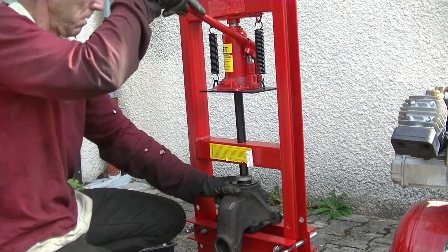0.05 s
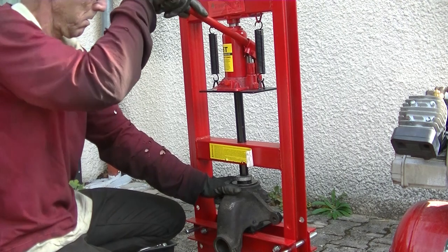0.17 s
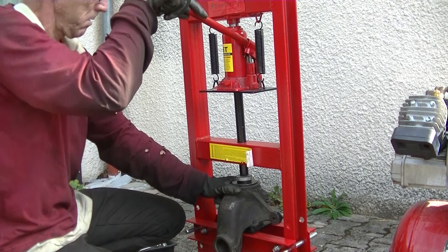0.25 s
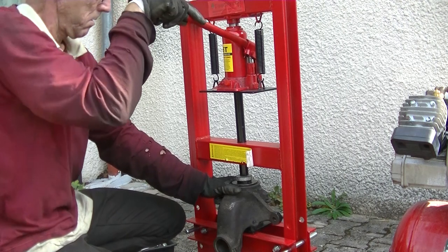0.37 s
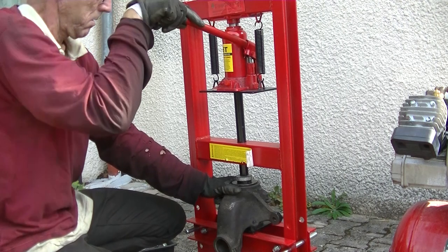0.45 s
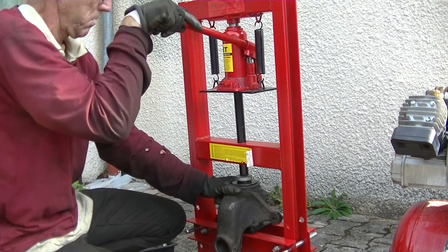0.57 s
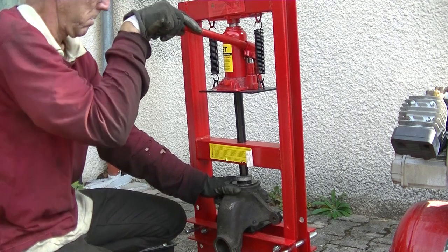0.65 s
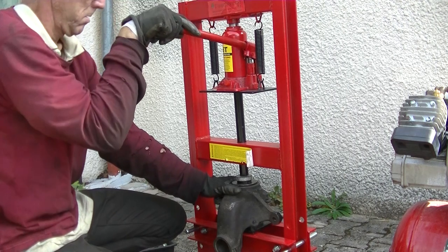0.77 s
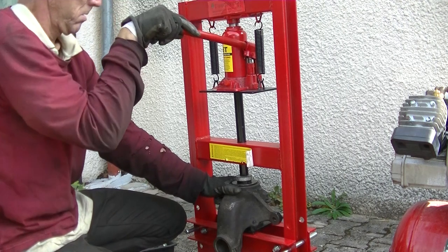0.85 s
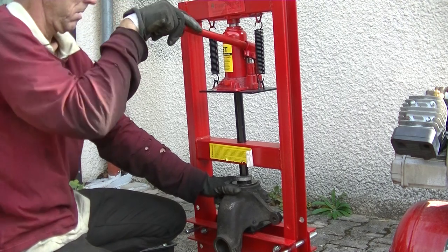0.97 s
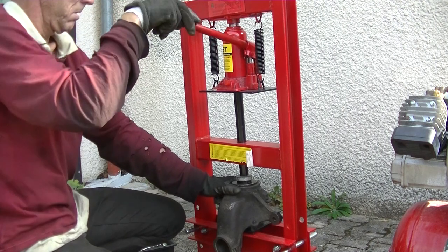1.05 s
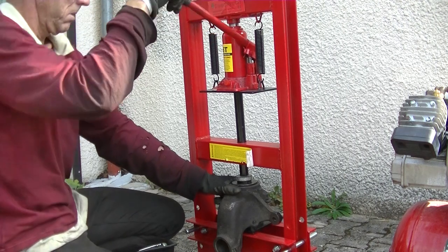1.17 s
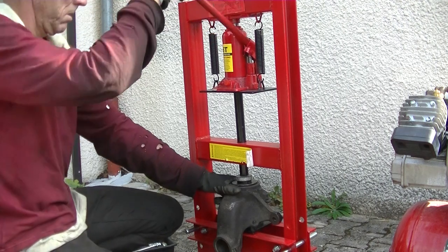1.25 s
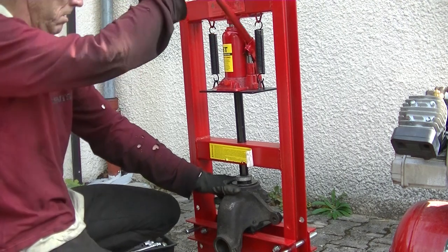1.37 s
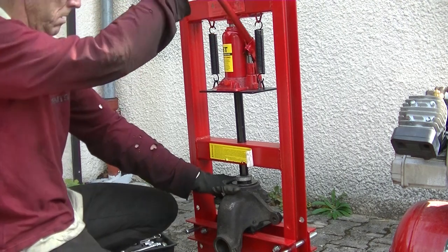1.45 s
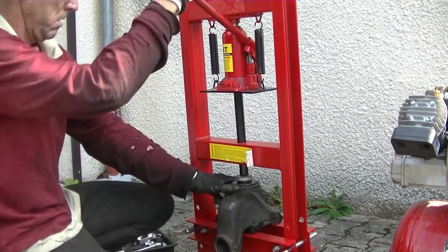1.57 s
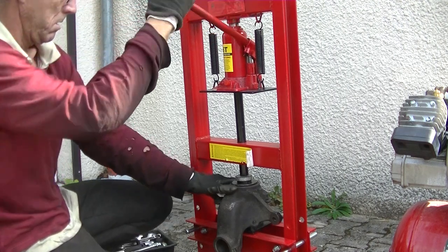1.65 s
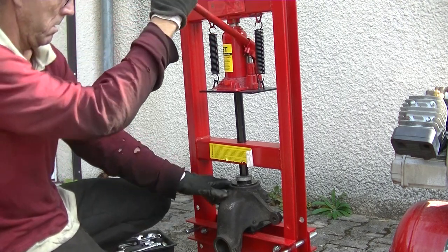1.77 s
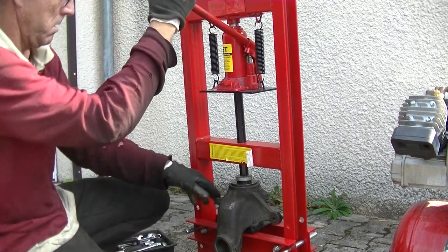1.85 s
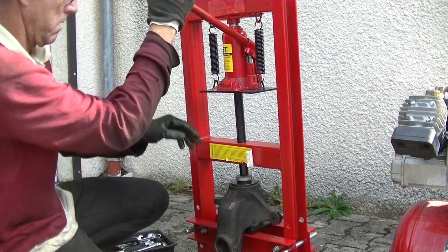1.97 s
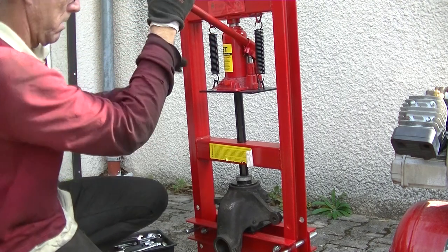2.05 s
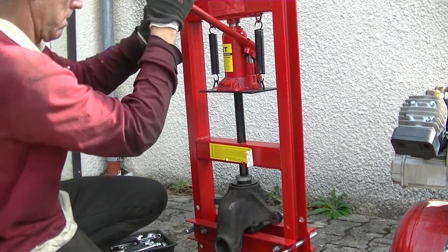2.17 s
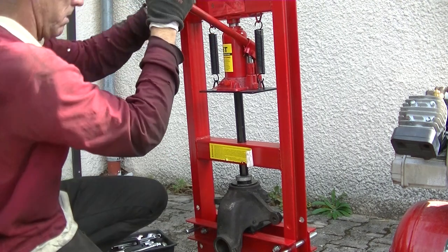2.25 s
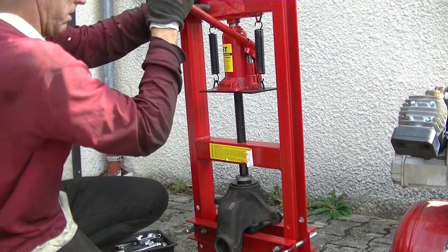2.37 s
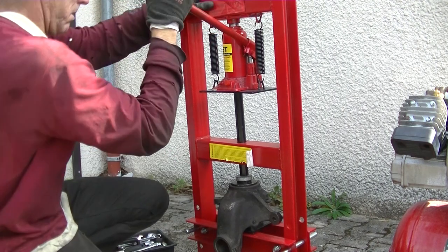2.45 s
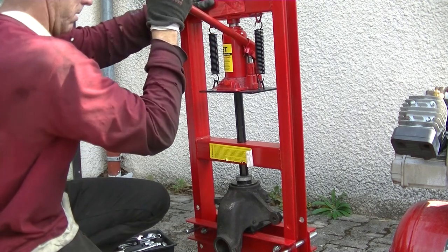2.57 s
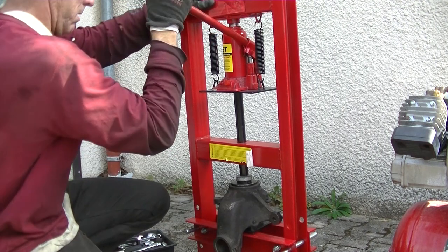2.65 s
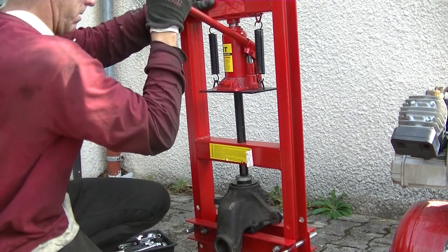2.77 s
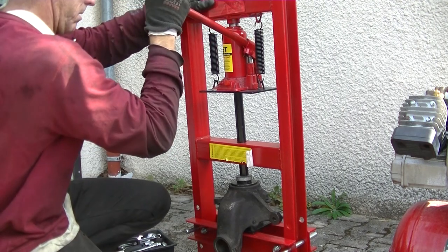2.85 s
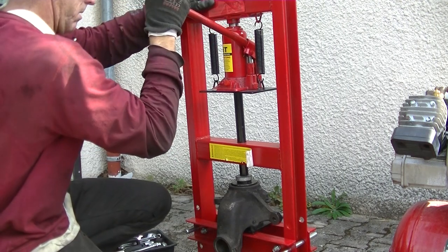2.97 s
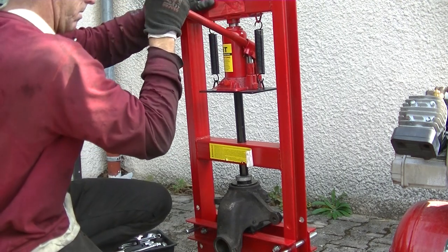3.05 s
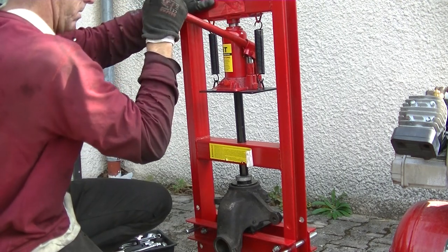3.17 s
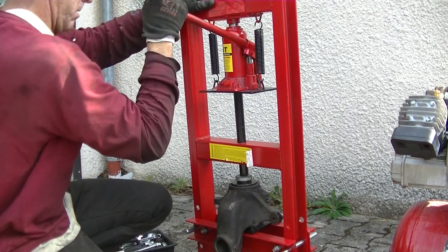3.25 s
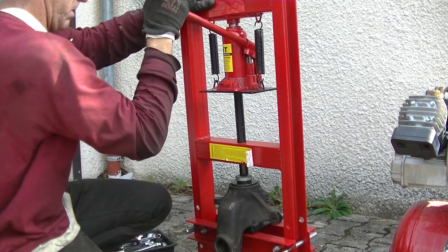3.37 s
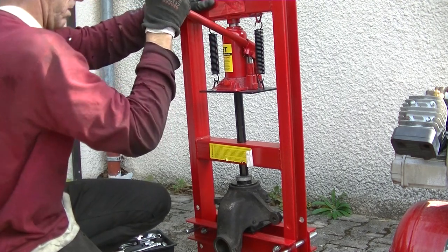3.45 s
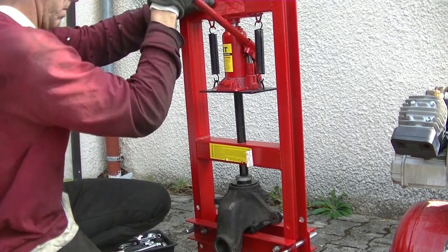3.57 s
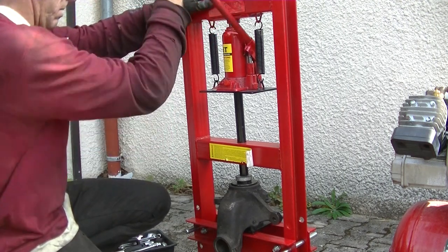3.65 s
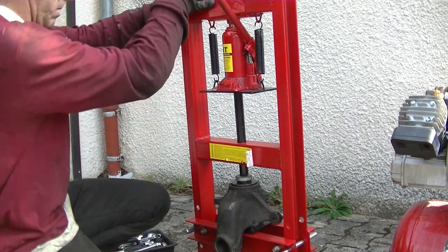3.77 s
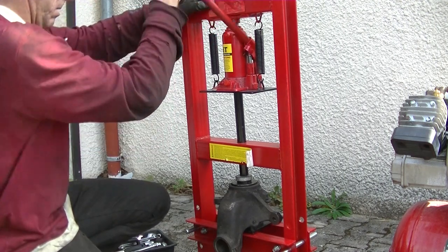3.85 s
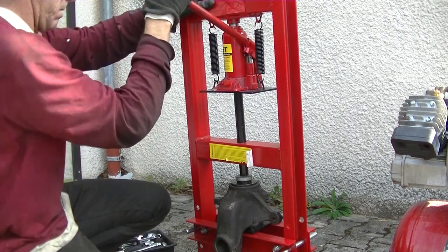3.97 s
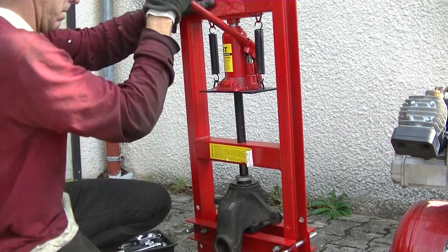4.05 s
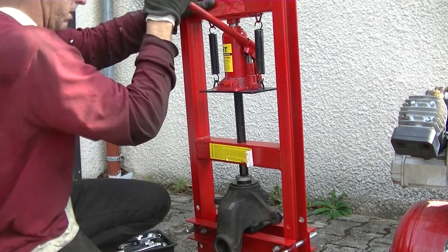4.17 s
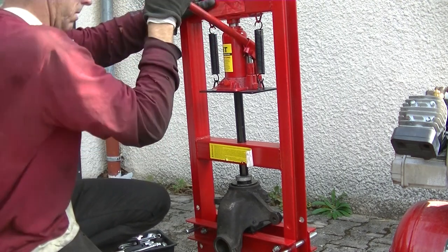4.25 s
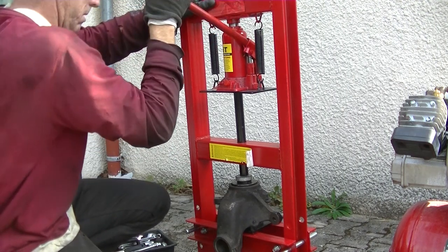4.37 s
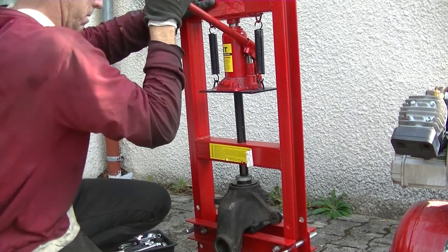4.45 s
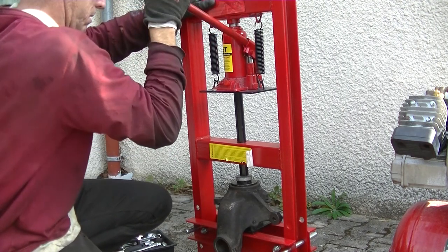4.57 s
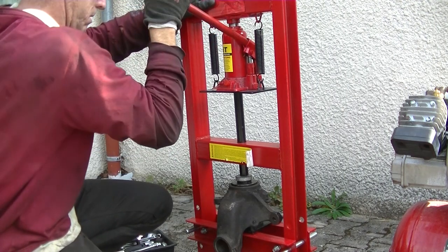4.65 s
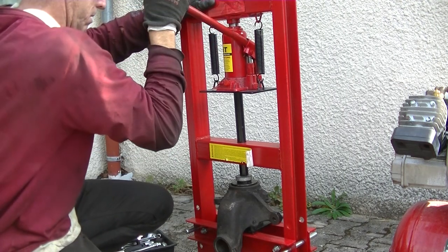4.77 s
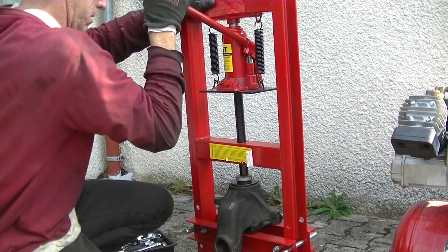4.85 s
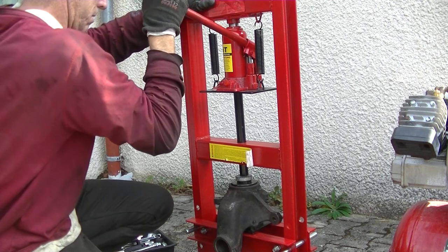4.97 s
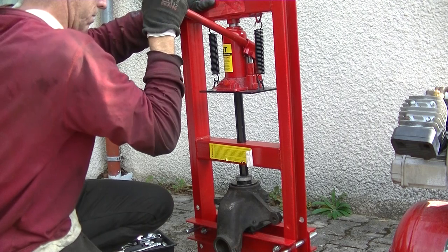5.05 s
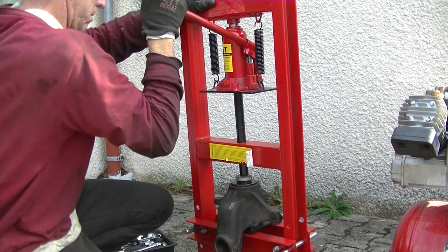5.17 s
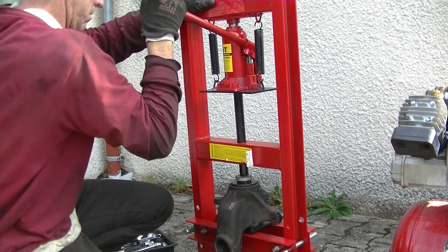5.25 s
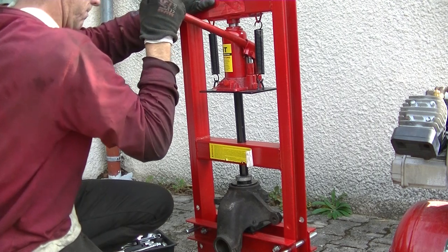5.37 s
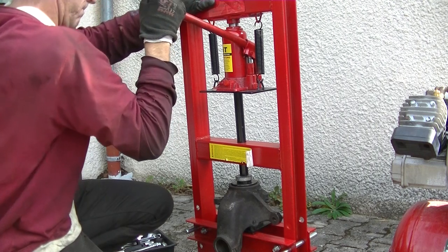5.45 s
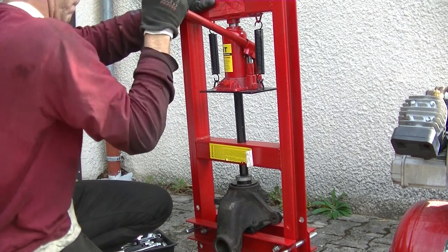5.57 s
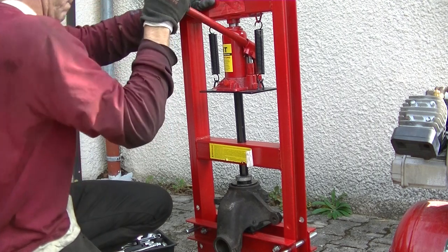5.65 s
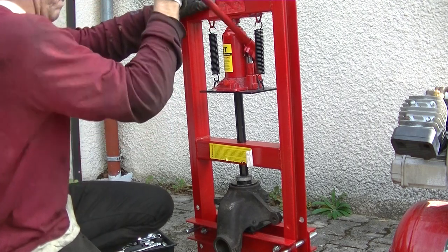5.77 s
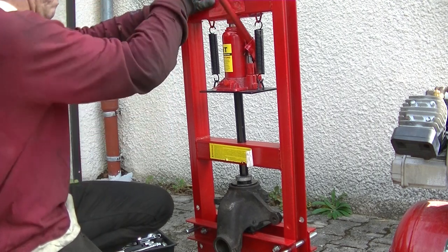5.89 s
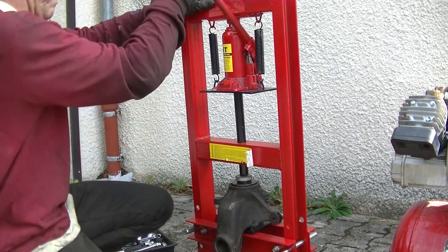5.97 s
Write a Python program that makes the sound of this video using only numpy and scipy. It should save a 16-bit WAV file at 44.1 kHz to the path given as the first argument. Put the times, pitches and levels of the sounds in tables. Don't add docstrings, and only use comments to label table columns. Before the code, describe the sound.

A hand lever works a hydraulic press in a steel frame outdoors. Loose pins crack, bounce and ring briefly, the linkage rubs with dry grit, and the frame lurches with a low, soft hum. The strokes come irregularly: the loudest early, a pair in the middle, a cluster at the end, with faint ticks between. Steady soft background wash and microphone hiss, dry open-air sound, close and slightly right.

```python
import sys
import numpy as np
from scipy import signal
from scipy.fft import rfft, irfft
from scipy.io import wavfile
from scipy.ndimage import uniform_filter1d

SR = 44100
rng = np.random.default_rng(int(sys.argv[2]) if len(sys.argv) > 2 else 0)


def unload_wav(signal):
    wavfile.write(
        sys.argv[1],
        SR,
        np.round(np.clip(np.atleast_2d(signal).T, -1, 1) * 32767).astype(np.int16),
    )


def voltage_ratio(decibels):
    exponent = np.asarray(decibels, float) / 20
    return 10 ** exponent


N = 265482


def evened(x):
    return x / np.sqrt(np.mean(x ** 2) + 1e-20)


def read(points, hz):
    f, value = np.transpose(points)
    return np.interp(np.log(hz + 1), np.log(f + 1), value)


def add(mix, s, sound):
    part = mix[round(s * SR):][:len(sound)]
    part += sound[:len(part)]


def highpass(x, order, hz):
    return signal.sosfilt(signal.butter(order, hz, "high", fs=SR, output="sos"), x)


def resonate(x, hz, width):
    turn = np.exp(2j * np.pi * np.cumsum(hz * np.ones(len(x))) / SR)
    r = np.exp(-np.pi * width / SR)
    smooth = signal.lfilter([1 - r], [1, -r], x / turn + 1e-18)
    return 2 * (turn * smooth).real


def hump(t, s, swell, fade):
    return -10 * np.where(t < s, (s - t) / max(swell, .004), (t - s) / max(fade, .004))


# (frequency [Hz], density [dB per Hz])
YARD = [(15, -66), (25, -47), (146, -7.5), (245, -4.5), (273, -2), (349, -5.5), (410, -7.5), (726, -16),
        (979, -12), (1250, -16), (1510, -14.5), (1730, -13.5), (7920, -15), (15200, -23.5), (16500, -58)]
# (frequency [Hz], correlation [-1 to 1])
SAME = [(60, 0.78), (180, 0.5), (550, 0.7), (1650, 0.71), (4970, 0.27), (15000, 0.15)]
# (frequency [Hz], left-right level [dB])
LEAN = [(60, 0.42), (240, -0.61), (950, 0.27), (3770, -0.14), (15000, -0.66)]
YARD_DB = -58


def yard():
    frames, hz = N // 256 + 5, np.fft.rfftfreq(1024, 1 / SR)
    a, b, c, d, patches = rng.standard_normal((frames, 513, 5)).T
    patches = evened(uniform_filter1d(uniform_filter1d(patches, 12, 0), 14, 1))
    same = np.clip(read(SAME, hz), -1, 1)[:, None]
    left = a + 1j * b
    right = same * left + np.sqrt(1 - same ** 2) * (c + 1j * d)
    z = np.array([left, right])
    z *= voltage_ratio(read(YARD, hz)[:, None] + .6 * patches)
    z *= voltage_ratio(-2.0 * (hz > 8000))[:, None]
    z *= voltage_ratio(np.multiply.outer([.5, -.5], read(LEAN, hz)))[:, :, None]
    wash = signal.istft(z, nperseg=1024, noverlap=768)[1][:, :N]
    return voltage_ratio(YARD_DB) * evened(wash)


# (frequency [Hz], level [dB])
WHINE = [
    (7800, -86.5),
    (7827, -95),
]


def whine():
    t = np.arange(N) / SR
    return sum(voltage_ratio(db - 9) * np.sin(2 * np.pi * hz * t) for hz, db in WHINE)


HUM = 154.5, -55.5, 1.9


def plate_hum():
    hz, db, t60 = HUM
    t = np.arange(N) / SR
    deeper = voltage_ratio(5.0 - 60 * t / 0.18) * np.sin(2 * np.pi * 110 * t + 1)
    return voltage_ratio(db - 60 * t / t60) * (np.sin(2 * np.pi * hz * t) + deeper)


# (fullest time [s], level [dB], pitch [Hz], swell [s], fade [s])
LURCHES = [(1.19, -63, 133, 0.032, 0.07), (1.275, -57, 149, 0.046, 0.078), (1.483, -44.5, 123, .018, 0.038),
           (1.639, -57, 137, 0.02, 0.087), (2.406, -55, 132.6, 0.0091, 0.043), (2.45, -68, 90, .03, 0.12),
           (2.47, -67, 145, 0.062, 0.11), (3.328, -60, 112.2, 0.015, 0.031),
           (3.629, -58.5, 121.4, .02, 0.058), (3.716, -53.5, 127.3, 0.039, 0.043),
           (3.8, -63, 135, 0.082, 0.088), (3.93, -56.5, 128, 0.019, 0.11),
           (4.034, -50, 138.3, 0.076, 0.058), (4.262, -61, 171, 0.019, 0.028),
           (5.729, -60.5, 122, 0.013, 0.049), (5.822, -62, 126.7, 0.035, 0.046),
           (5.926, -57, 124, 0.094, 0.017), (5.986, -56, 122.3, 0.02, .036)]
LEAD_S = .3
THUD_DB, THUD_LAG_DB = -22, 11
BOOM_DB = -13


def sway():
    out, t = np.zeros(N), np.arange(3 * SR // 4) / SR
    for s, db, hz, swell, fade in LURCHES:
        rough, heavy = rng.standard_normal((2, len(t)))
        shudder = np.sin(2 * np.pi * hz * t) + 0.82 * evened(resonate(resonate(rough, hz, 60), hz, 62))
        thud = evened(resonate(resonate(heavy, 110, 37), 110, 37))
        thud_db = THUD_DB + THUD_LAG_DB * np.clip((t - LEAD_S) / fade, 0, 2)
        boom = evened(resonate(resonate(heavy, 226, 65), 225, 70))
        lurch = shudder + voltage_ratio(thud_db) * thud + voltage_ratio(BOOM_DB) * boom
        add(out, s - LEAD_S, voltage_ratio(db + hump(t, LEAD_S, swell, fade)) * lurch)
    return out


SQUEAK = .4, -70, 4500, .07


def seal_squeak(rub):
    s, db, hz, span = SQUEAK
    t = np.arange(N) / SR
    return voltage_ratio(db + hump(t, s, span, span)) * evened(resonate(resonate(rub, hz, 250), hz, 250))


# (frequency [Hz], level [dB])
GRIT = [(590, -37), (1000, -23), (1330, -35), (1860, -1.5), (4460, 7), (6490, 1.5), (8510, -11),
        (10300, -6.5), (15000, -40)]
# (fullest time [s], level [dB], swell [s], fade [s])
RUBS = [(0, -65.5, .05, 0.092), (.45, -66.5, 0.14, .06), (1.14, -50, 0.094, 0.22),
        (1.24, -56, 0.074, 0.037), (1.36, -57.5, 0.14, 0.096), (1.5, -46.5, 0.068, 0.037),
        (1.76, -55, 0.53, 0.085), (1.82, -57, .1, 0.026), (2.23, -65, 0.41, .15),
        (2.4, -48.5, 0.047, 0.049), (2.55, -51.5, 0.063, 0.15), (2.7, -50, 0.036, 0.051),
        (3.12, -60, .03, .04), (3.25, -60, 0.11, 0.15), (3.72, -46.5, 0.086, 0.068),
        (3.96, -57, 0.091, 0.09), (4.51, -57.5, 0.14, .08), (4.75, -63.5, 0.13, 0.24),
        (5.28, -59.5, 0.055, 0.18), (5.45, -69, .2, .3), (5.71, -60.5, 0.19, 0.11),
        (5.745, -57, 0.018, .03), (5.8, -58, 0.063, .15), (5.93, -54.5, .15, 0.063)]
CREEP_DB = -70.5
SLIPS_PER_S = 2500


def scrape():
    t = np.arange(N) / SR
    power = voltage_ratio(2 * CREEP_DB)
    for s, db, swell, fade in RUBS:
        power = power + voltage_ratio(2 * (db + hump(t, s, swell, fade)))
    clumps_db = 2.0 * evened(uniform_filter1d(rng.standard_normal(N), 300))
    slip_size = voltage_ratio(1.5 * np.minimum(rng.exponential(1, N), 5))
    slips = slip_size * (rng.random(N) < SLIPS_PER_S / SR) * rng.choice([-1, 1], N)
    rub = evened(slips) + 0.76 * rng.standard_normal(N)
    grit = irfft(rfft(rub) * voltage_ratio(read(GRIT, np.fft.rfftfreq(N, 1 / SR))), N)
    return np.sqrt(power) * voltage_ratio(clumps_db) * evened(grit) + seal_squeak(rub)


# (frequency [Hz], level [dB], t60 [s])
LINK = [(4900, 0, .12), (5150, -12, .1), (6210, -5, .06), (8750, -17, .045), (10400, -24, .05),
        (12400, -28, .04)]
# (time [s], level [dB], brightness [dB per octave])
LINK_BLOWS = [(1.143, -48, -7), (1.151, -38, 2), (1.187, -43, 3), (1.192, -44, 12), (1.2005, -47, -1),
              (1.22, -29, -6), (1.238, -42, -4), (1.283, -45, -6), (1.291, -44, -3), (1.306, -50, 15.5),
              (1.42, -42, -1), (1.436, -43, -6)]
# (frequency [Hz], level [dB], t60 [s])
FRAME = [(863, -12, 0.18), (1462, -19.5, 0.5), (2013, -10.5, 0.61), (2150, -13, .13), (2478, -6, 0.3),
         (3090, -15.5, 0.24), (3569, -13, 0.2), (4210, -3, 0.17), (4398, -3, 0.18), (4550, -8, .17),
         (4748, -8, .15), (5070, -8, 0.17), (5930, -9, .18), (7106, -12, .08)]
# (time [s], level [dB], brightness [dB per octave])
FRAME_BLOWS = [
    (1.446, -31, 1),
]
# (frequency [Hz], level [dB], t60 [s])
SOCKET = [(1895, -18, 0.14), (2210, -6, .06), (2482, -4, 0.061), (2730, -19, .04), (3370, -2.5, 0.11),
          (3490, -6, .075), (3887, -8.5, .12), (4400, -14, .12), (4893, -10, 0.1), (5760, -16, 0.065),
          (6540, -16, 0.066), (8670, -24, 0.043)]
# (time [s], level [dB], brightness [dB per octave])
SOCKET_BLOWS = [
    (3.684, -21, 3.5),
    (3.6956, -38, -4),
]
# (frequency [Hz], level [dB], t60 [s])
PIN = [(3741, -6, .06), (4043, 0, .05), (4517, -5, .06), (5098, -14, .07), (6083, -24, .06),
       (6444, -19, .05), (7100, -25, .07), (10300, -31, .04), (12760, -28, .05)]
# (time [s], level [dB], brightness [dB per octave])
PIN_BLOWS = [
    (3.643, -23.5, 2),
    (3.6504, -27.5, 6),
    (3.743, -48, 12),
    (3.9084, -30.5, 3),
    (3.911, -41, 1),
    (3.9355, -45, -9),
    (5.8214, -24, 2),
    (5.903, -53, 16),
]
# (frequency [Hz], level [dB], t60 [s])
LUG = [(2640, -2, .13), (2775, -4, .1), (4037, -6, .06)]
# (time [s], level [dB], brightness [dB per octave])
LUG_BLOWS = [
    (1.15, -48, 0),
    (1.162, -41, 0),
    (1.201, -47, 0),
    (1.22, -33, -3),
    (1.232, -34, -12),
    (1.244, -36.5, -10),
    (1.256, -47, 0),
    (1.42, -47, 0),
]
# (frequency [Hz], level [dB], t60 [s])
CATCH = [(2143, -2, .24), (2552, -8, .11), (2907, -1, .08), (4400, -3, .05), (6632, -7, .14),
         (7337, -10, .1), (8522, -7, .06)]
# (time [s], level [dB], brightness [dB per octave])
CATCH_BLOWS = [
    (1.597, -48.5, -1),
    (3.2635, -42.5, 0.36),
]
# (frequency [Hz], level [dB], t60 [s])
PLATE = [(437, -7.5, 0.061), (1165, -14, 0.13), (1760, -4, 0.1), (2470, -11, .078), (2900, -4, 0.082),
         (3780, -8, .08), (3860, -7, 0.097), (5040, -11, 0.073)]
# (time [s], level [dB], brightness [dB per octave])
PLATE_BLOWS = [
    (5.657, -32.5, -0.55),
    (5.774, -43, -0.77),
]
# (frequency [Hz], level [dB], t60 [s])
HOOK = [(2202, -13, .05), (2420, -8, .045), (2650, -6, .035), (3257, -16, .09), (3391, -9, .07),
        (3752, -5, .035), (3951, -7, .06), (4893, 0, .022), (4950, -14, .13), (6300, -18, .035),
        (9200, -24, .03)]
# (time [s], level [dB], brightness [dB per octave])
HOOK_BLOWS = [
    (5.8363, -19.5, 2),
    (5.85, -35, -9),
    (5.892, -45, -3),
]
# (frequency [Hz], level [dB], t60 [s])
SLEEVE = [(4010, 4, .02), (4400, -14, .06), (7009, -17, .02), (10060, -15, .03)]
# (time [s], level [dB], brightness [dB per octave])
SLEEVE_BLOWS = [
    (5.8138, -23, 0),
    (5.8153, -20, -4),
]


def rings():
    parts = [(LINK, LINK_BLOWS), (FRAME, FRAME_BLOWS), (SOCKET, SOCKET_BLOWS), (PIN, PIN_BLOWS),
             (LUG, LUG_BLOWS), (CATCH, CATCH_BLOWS), (PLATE, PLATE_BLOWS), (HOOK, HOOK_BLOWS),
             (SLEEVE, SLEEVE_BLOWS)]
    return [(s, hz, blow_db + db + bright * np.log2(hz / 3000), t60)
            for modes, blows in parts for s, blow_db, bright in blows for hz, db, t60 in modes]


def ring(hz, db, t60):
    t = np.arange(SR // 3) / SR
    off, phase = rng.uniform(-1.12, 1, (2, 3, 1))
    neighbours = .45 * np.sin(2 * np.pi * (hz * (1 + .015 * off) * t + phase)).sum(0)
    tone = np.sin(2 * np.pi * hz * t) + neighbours * voltage_ratio(-60 * t / .2)
    decay = voltage_ratio(db - 3.5 - 60 * t / np.clip(t60, .02, 1100 / hz))
    return decay * tone * np.minimum(t / .0015, 1)


# (time [s], peak level [dB], loudest ring [Hz], treble [dB], rattle [dB])
CLACKS = [(1.1916, -37, 3920, -10, -6), (1.201, -30, 6200, -3.5, -4), (1.22, -21.5, 4100, -23, -8),
          (1.2371, -25.5, 3810, -14, -14), (1.2825, -25.5, 4430, -14, -8), (1.2892, -28.5, 3750, -25, -7),
          (1.295, -31.5, 3480, -25, -7), (1.307, -39.5, 3420, -12, 1), (1.446, -1.5, 4540, -27, -20),
          (1.5892, -26.5, 4700, -16, -5), (1.593, -32, 4400, -15, -10), (1.5947, -19, 4000, -10, -10),
          (1.596, -31, 4100, -15, -14), (1.6266, -29, 4460, -20, -9.5), (2.7222, -33, 5700, -13, -6),
          (3.6437, -19, 4220, -2, -13.5), (3.6498, -18.5, 4440, -8, -17), (3.6831, -12, 2890, -30, -9.5),
          (3.6856, -18.5, 3480, -6, -10), (3.7432, -32.5, 7100, -12, -9), (3.9017, -33, 4400, -8, -8),
          (3.9032, -22, 4400, -1.5, -12.5), (3.9114, -20, 4640, -2.5, -14.5),
          (3.9368, -25, 3600, -31, -10.5), (5.8136, -21, 4030, -4.5, -9), (5.8362, -15, 2880, -30, -10.5),
          (5.8385, -20.5, 4000, -24, -10), (5.8918, -26, 3400, -23, -12), (5.9024, -31.5, 3580, -7, -5.5),
          (5.9226, -27, 4300, -15, -9)]
CLANK_DB, CLANK_PER_DB, CLANK_DB_PER_OCTAVE = -26.5, -0.31, -5.5
# (time [s], peak level [dB], loudest ring [Hz], low clank [dB], rattle [dB])
THUMPS = [(1.1497, -36, 2530, -7.5, -7), (1.16, -35, 3860, -9, -11), (1.245, -42, 2620, -20, -14),
          (1.437, -37, 4770, 1.5, 2), (1.573, -33, 4200, -24, -16), (2.379, -35.5, 4240, -14, -3.5),
          (3.263, -35, 4420, -15, -5), (3.6296, -44, 3800, -10, -5), (3.8702, -33, 3760, -14, -5),
          (5.457, -46.5, 4700, -9, -22), (5.61, -46.5, 4030, -9, -14), (5.6508, -42, 2850, 3.5, -19),
          (5.657, -29.5, 4650, -3, -13), (5.7736, -25.5, 4900, -8.5, -14), (5.807, -32, 3320, -7, -12),
          (5.8215, -26, 4140, -16, -8), (3.6956, -27, 2700, -28, -23)]
THUMP_TREBLE_DB = -42.5
# (time [s], peak level [dB], loudest ring [Hz], treble [dB])
TICKS = [(1.259, -33, 2840, -20), (1.2743, -38, 3000, -28), (1.2787, -28, 3900, -28),
         (1.4203, -35, 4700, -12), (1.939, -39, 3860, -23), (2.2797, -40, 6200, -4),
         (2.2948, -44, 2960, -5), (2.418, -35.5, 4650, -16), (2.5498, -37, 4200, -11),
         (2.681, -40, 5060, -6), (3.111, -45.5, 4830, -11), (3.778, -35, 3970, -10),
         (3.8767, -40, 3780, -25), (3.8863, -32, 4440, -30), (3.896, -39, 3900, -25),
         (3.908, -23, 3900, -6), (4.456, -44, 4700, -14), (4.4934, -48, 3440, -19),
         (4.513, -42.5, 5160, -9), (4.543, -39.5, 4840, -16), (5.296, -43.5, 4800, -21),
         (5.3306, -46, 4330, -21), (5.7356, -38, 3020, -34), (5.739, -39, 3840, -30),
         (5.706, -47, 4700, -30), (5.676, -48, 3800, -27)]
TICK_CLANK_DB, TICK_RATTLE_DB = -39, -7.5


def knocks():
    rows = []
    for s, db, hz, treble, rattle in CLACKS:
        clank = CLANK_DB + CLANK_PER_DB * (db + 16) + CLANK_DB_PER_OCTAVE * np.log2(hz / 3800)
        rows.append((s, db, hz, treble, clank, rattle))
    for s, db, hz, clank, rattle in THUMPS:
        rows.append((s, db, hz, THUMP_TREBLE_DB, clank, rattle))
    for tick in TICKS:
        rows.append((*tick, TICK_CLANK_DB, TICK_RATTLE_DB))
    return sorted(rows)


# (frequency [Hz], level [dB])
STEEL = [(180, -55), (300, -21), (701, -32.5), (870, -21.5), (1300, -22.5), (2480, -6), (3030, -4),
         (3460, -3), (4830, 4), (5430, -0.5), (10200, 5.5), (16000, -3)]
SNAP_DB, SNAP_T60 = 2.5, 0.018
CHATTER_DB = 2.5


def knock(peak_db, ring_hz, treble_db, clank_db, rattle_db):
    noise = rng.standard_normal(4096)
    rattle_db = max(rattle_db, -26)
    t, hz = np.arange(len(noise)) / SR, np.fft.rfftfreq(len(noise), 1 / SR)
    crack = np.exp(-(t / .0012) ** 2) * np.sin(2 * np.pi * ring_hz * t)
    out = voltage_ratio(-.6 * max(rattle_db + 12, 0)) * crack
    ring_peak_db = 2.6 * np.exp(-(np.log((hz + 1) / ring_hz) / 0.12) ** 2)
    colour = voltage_ratio(read(STEEL, hz) + ring_peak_db)
    bounces = uniform_filter1d(uniform_filter1d(noise[::-1], size=90), size=90)
    chatter = voltage_ratio(CHATTER_DB * evened(bounces))
    snap = voltage_ratio(SNAP_DB - 60 * t / SNAP_T60)
    bands = [(380, 2100, clank_db - 11, 0.36),
             (2000, 4700, rattle_db - 9.0, 0.098),
             (8300, 11000, treble_db + rattle_db - 16, 0.046)]
    for lo_hz, hi_hz, db, t60 in bands:
        edges = 1 / np.sqrt((1 + (lo_hz / (hz + 1)) ** 12) * (1 + (hz / hi_hz) ** 8))
        band = evened(irfft(rfft(noise) * colour * edges, len(noise)))
        out += voltage_ratio(db) * (voltage_ratio(-60 * t / t60) * chatter + snap) * band
    out += voltage_ratio(treble_db - 8 - 60 * t / 0.0067) * band
    out += voltage_ratio(-6.5) * np.exp(-(t / 0.00035) ** 2) * np.sin(2 * np.pi * 1.38 * ring_hz * t)
    return voltage_ratio(peak_db) * out * np.minimum(t / .0002, 1)


def lever():
    out = np.zeros(N)
    for s, *row in knocks():
        add(out, s, knock(*row))
    for s, *mode in rings():
        add(out, s, ring(*mode))
    return highpass(out, 2, 350)


# (delay [s], level [dB])
ECHOES = [
    (.0028, -10.5),
    (.0056, -20),
    (0.0116, -16.5),
]
# (frequency [Hz], t60 [s])
TAIL = [(500, 0.23), (1500, 0.063), (4000, 0.084), (10000, 0.13)]


def walls(x, tail_db=-11):
    taps = np.zeros((2, SR // 2))
    at = np.arange(300, SR // 2 - 20, 20) + rng.integers(0, 20, (2, (SR // 2 - 301) // 20))
    np.put_along_axis(taps, at, rng.choice([-1., 1.], at.shape), 1)
    hz, t, z = signal.stft(taps, SR, nperseg=256)
    tail = signal.istft(z * voltage_ratio(-60 * t / read(TAIL, hz)[:, None]), SR, nperseg=256)[1]
    tail *= voltage_ratio(tail_db) / np.linalg.norm(tail[0])
    for s, db in ECHOES:
        smear = evened(rng.standard_normal(60)) / np.sqrt(60)
        tail[:, round(s * SR):][:, :60] += voltage_ratio(db) * smear
    return signal.fftconvolve(x[None], tail, axes=1)[:, :N]


# (frequency [Hz], left-right level [dB])
PORTS = [(60, -6), (150, 1), (380, 0), (950, -0.5), (2380, -2.5), (5980, -3.5), (15000, -1)]


def ports(x):
    hz = np.fft.rfftfreq(N, 1 / SR)
    wander = np.interp(hz, np.linspace(0, SR / 2, 30), rng.standard_normal(30))
    turn = wander * 0.83 * hz ** 4 / (hz ** 4 + 6700.0 ** 4)
    gain = voltage_ratio(np.outer([.5, -.5], read(PORTS, hz))) * np.exp(1j * np.outer([1, -1], turn))
    return irfft(rfft(x) * gain, N)


def scene():
    background = yard() + whine()
    low = highpass(sway() + plate_hum(), 4, 75)
    press = scrape() + lever()
    return ports(press + walls(press)) + low * voltage_ratio(np.array([[-.4], [.4]])) + background


def roll_off(x):
    return signal.sosfilt(signal.butter(12, 16670, fs=SR, output="sos"), x)


def record(dry):
    ceiling = .9
    clipped = np.clip(dry, -ceiling, ceiling)
    edge = signal.firwin(255, 16300, window=("kaiser", 8), fs=SR)[None]
    mix = signal.oaconvolve(clipped, edge, "same")
    return roll_off(mix)


dry = scene()
out = record(dry)
unload_wav(out)
```